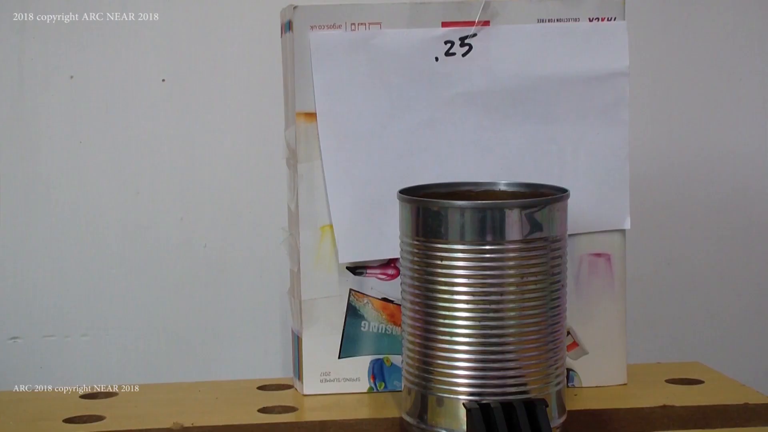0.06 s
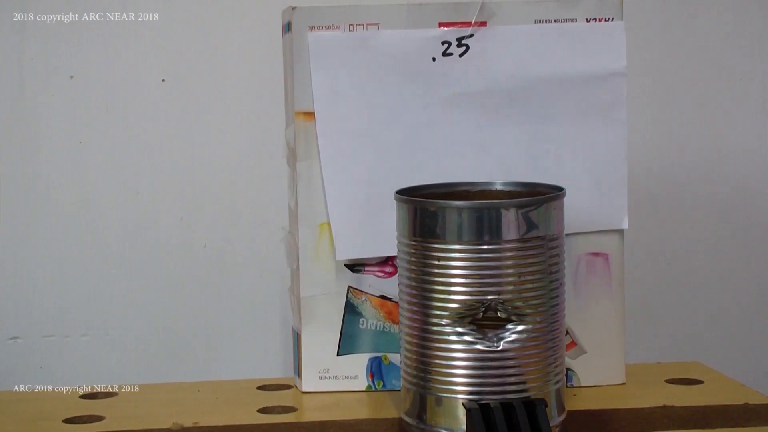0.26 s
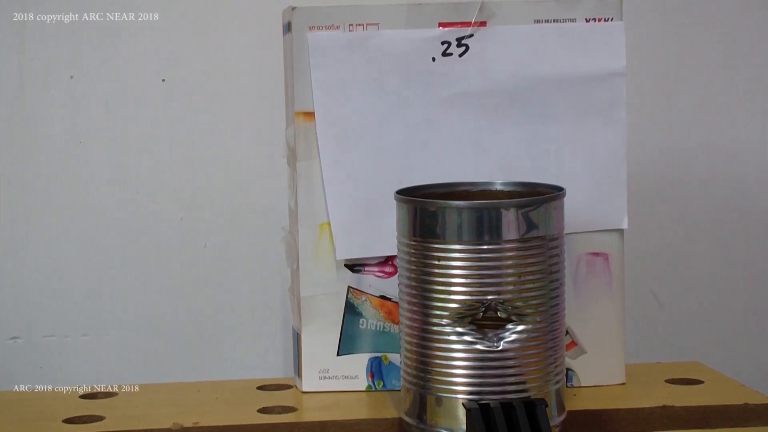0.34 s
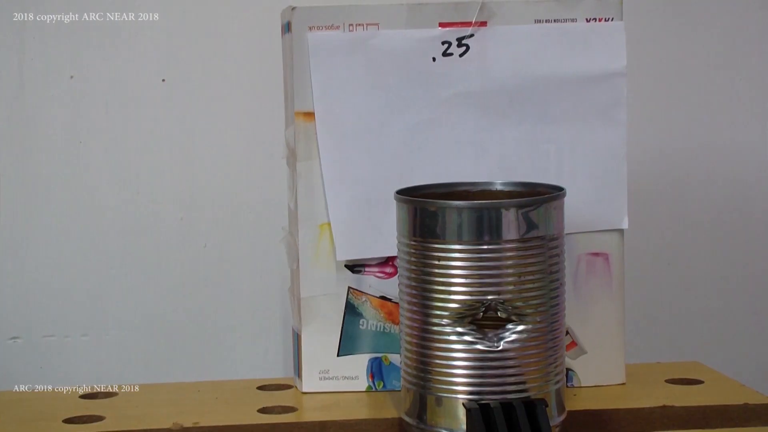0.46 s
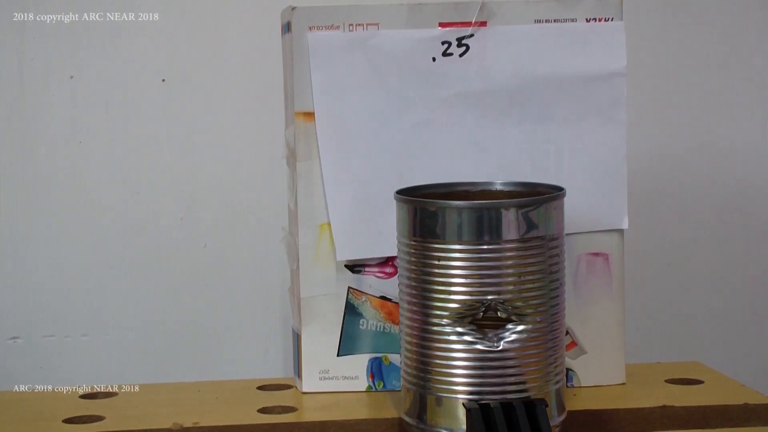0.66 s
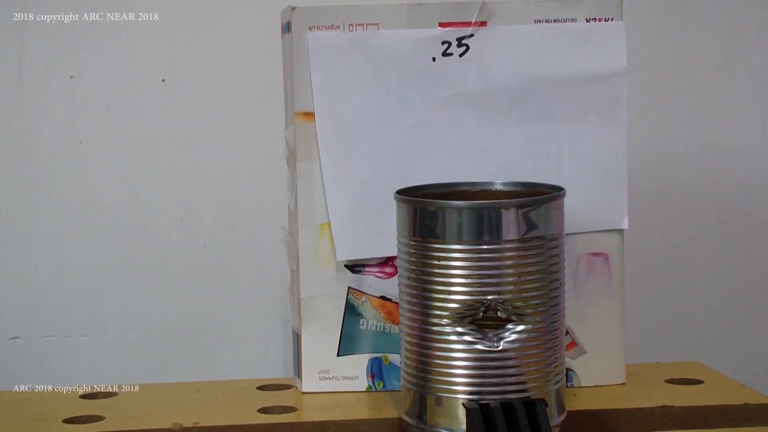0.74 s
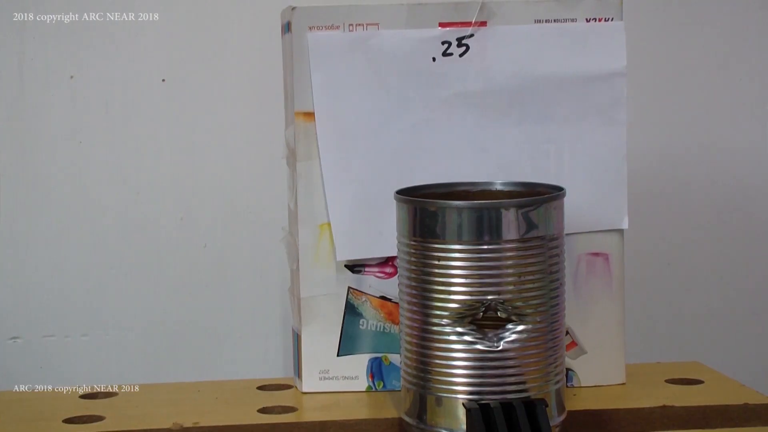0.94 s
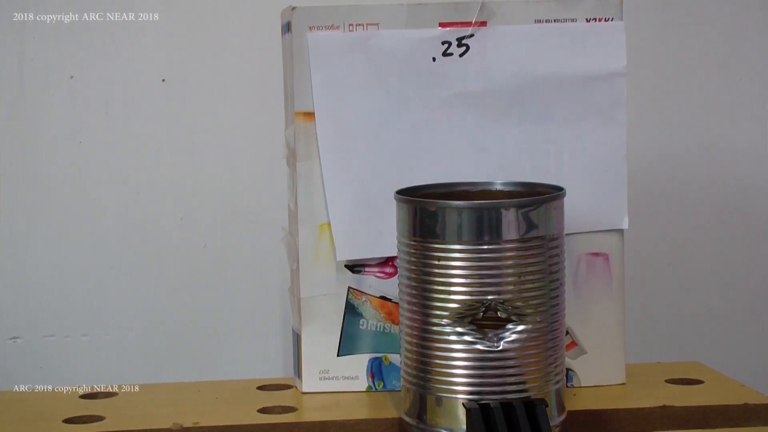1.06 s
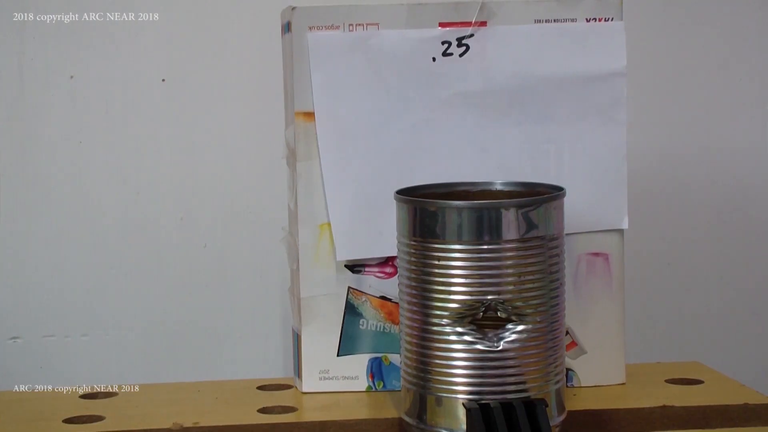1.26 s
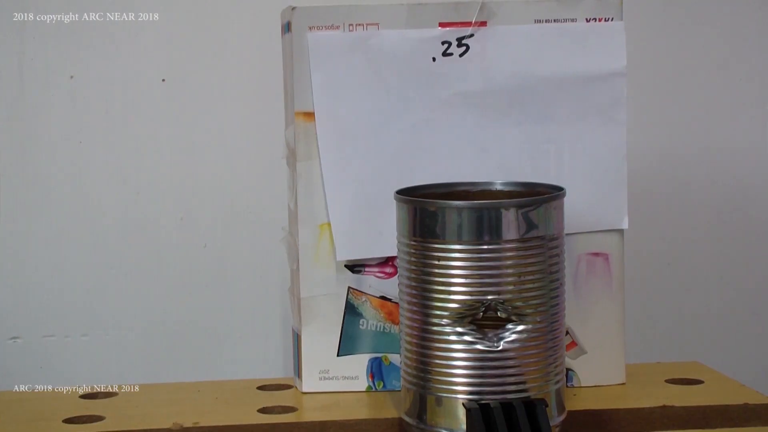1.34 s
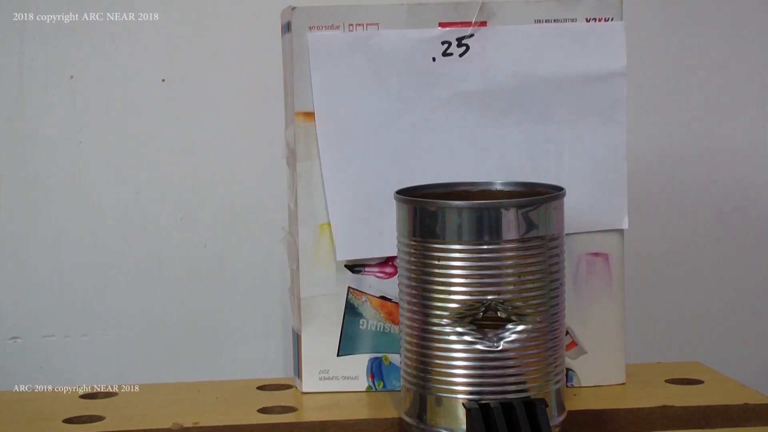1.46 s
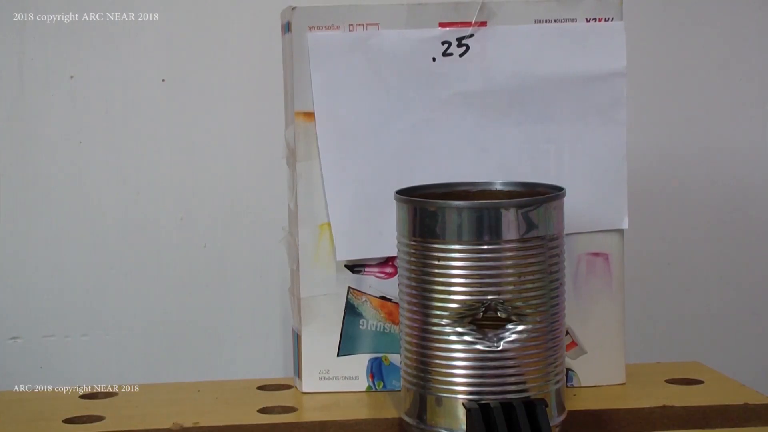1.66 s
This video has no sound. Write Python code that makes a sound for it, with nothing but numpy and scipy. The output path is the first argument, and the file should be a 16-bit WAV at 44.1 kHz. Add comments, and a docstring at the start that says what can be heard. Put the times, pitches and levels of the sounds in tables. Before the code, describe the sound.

An air rifle fires at about 0.2 seconds and its pellet instantly hits a tin can: one loud, sharp bang that overloads the microphone and rings briefly in a small hard room. Metal bits tick down around 0.5 seconds. The rifle clicks at 0.9 and 1.2 seconds, with very faint creaks. From 1.4 to 1.7 seconds a hard object clatters lightly to rest over faint hiss.

```python
"""A spring air rifle fires in a small hard room: its spring lets go and its piston slams home.
The pellet rips into a nearby tin can, which rings. The bang overloads the microphone, so a limiter
turns the sound down, then lets the ringing room swell back up. Bits of metal tick down, the rifle
clicks twice as it is handled, and something hard clatters to rest over faint creaks, rubs and hiss.
Each impact is a sharp snap plus fading noise and room echo, filtered to the tone of its object."""
import sys
import numpy as np
from scipy import signal
from scipy.fft import rfft, irfft
from scipy.io import wavfile
from scipy.ndimage import uniform_filter1d, minimum_filter1d

SR = 44100
rng = np.random.default_rng(int(sys.argv[2]) if len(sys.argv) > 2 else 0)


def wrap_up_sound(samples):
    """Save the sound to the file named by the first command line argument, as 16-bit audio."""
    columns = np.atleast_2d(samples).T
    # keep every value between -1 and 1, then stretch to whole-number steps
    tamed = np.clip(columns, -1, 1)
    steps = np.round(tamed * 32767).astype(np.int16)
    wavfile.write(sys.argv[1], SR, steps)


N = 74970  # 1.7 seconds

# The spring and piston let go: (time [s], level [dB], length [s])
SPRING_HITS = [(.2105, -28, .003), (.2122, -1, 0.006), (.2168, -9, 0.013)]
# Their tone: (frequency [Hz], level [dB])
SPRING_TONE = [(40, 15.5), (150, 9), (500, -11), (1200, -8), (2700, 11), (5500, 0.5), (9000, -11),
               (16000, -3.5)]
# The rifle kicks, the piston slams home, air leaves the barrel: (time [s], level [dB], length [s])
SHOT_THUMPS = [(.2100, -23, 0.012), (.2203, -5, 0.0013), (.2228, -2.5, 0.009)]
# Their deep tone: (frequency [Hz], level [dB])
THUMP_TONE = [(30, 20.5), (60, 5), (150, 7), (400, 1.5), (900, -4), (2000, -4), (4000, -13), (9000, -13),
              (16000, -10)]
# The rifle clicks as it is handled: (time [s], level [dB], length [s])
HANDLING_CLICKS = [(.8705, -13, 0.0091), (1.2278, -20, 0.013)]
# Their tone: (frequency [Hz], level [dB])
CLICK_TONE = [(40, -21), (120, -14), (200, -2), (400, 1.5), (800, 2.5), (1400, 0), (2700, 0), (4500, -4.5),
              (7000, -7), (10000, -16), (12500, -29), (15500, -25)]


def air_rifle():
    """The spring drives the piston home with a thump; later, handling makes two clicks."""
    spring = impacts(SPRING_HITS, SPRING_TONE, snap=0.05, echo_db=-4.5)
    thumps = impacts(SHOT_THUMPS, THUMP_TONE, snap=1.0, echo_db=-5)
    clicks = impacts(HANDLING_CLICKS, CLICK_TONE, snap=0.49, echo_db=-0.5)
    return spring + thumps + clicks


# The pellet tears into the can, then strikes once more: (time [s], level [dB], length [s])
PELLET_HITS = [(0.228, 43.5, 0.041), (.2560, 36, 0.015)]
# Their tone: (frequency [Hz], level [dB])
PELLET_TONE = [(30, -19), (120, -29.5), (400, -11.5), (600, -6.5), (800, 7), (1150, 1.5), (1550, 0.5),
               (2200, -2), (4500, -1.5), (8000, -4.5), (11000, -7), (16000, -12)]
# The can's notes; the last five linger faintly: (frequency [Hz], level [dB], time to fade 60 dB [s])
CAN_NOTES = [(180, -8, .27), (574, -5, .36), (675, 2, .28), (759, 9, .27), (828, 6, .27), (863, 5, .29),
             (1040, 0, .3), (1258, 3, .28), (1440, 0, .29), (1513, 2, .32), (1580, -6, .39),
             (1931, -1, .31), (2895, 0, .33), (4012, -1, .3), (4189, 0, .3), (4308, -1, .3),
             (4754, -1, .33), (7207, -4, .33), (7479, -2, .34), (7570, -3, .34), (11747, -7, .3),
             (667, -51, 1), (1183, -53, 1.2), (1572, -51, 1.1), (3801, -49, 1.25), (3860, -47, 1.25)]


def tin_can():
    """The pellet tears the tin, which rings with many fading notes at once."""
    out = impacts(PELLET_HITS, PELLET_TONE, snap=0.062, echo_db=2.5)
    hit_time = PELLET_HITS[0][0]
    t = np.arange(SR) / SR
    for hz, db, fade_s in CAN_NOTES:
        note = np.sin(2 * np.pi * (hz * t + rng.random()))
        add(out, hit_time, gain(db) * fade(t, fade_s) * note)
    return out


# The rifle's kick, then the pellet, shove the shelf: (time [s], level [dB], length [s])
SHELF_SHOVES = [(.2103, -11.5, 0.025), (.2290, 29.5, 0.025)]
# Their low tone: (frequency [Hz], level [dB])
SHELF_TONE = [(25, -18.5), (55, -15), (110, 2), (160, 3.5), (240, 0), (450, -9.5), (1000, -25.5),
              (4000, -47)]


def shelf_thuds():
    """Two shoves travel through the shelf as low thuds with almost no echo."""
    return impacts(SHELF_SHOVES, SHELF_TONE, snap=0.11, echo_db=-39)


# Bits of metal land: (time [s], level [dB], length [s])
BIT_LANDINGS = [(.4462, 0, .004), (.4742, -10, .003), (.4848, 3, .005), (.5338, -15, .004),
                (.5410, -19, .005)]
# Their bright tone: (frequency [Hz], level [dB])
BIT_TONE = [(200, -25), (1000, -16), (2200, -3.5), (4000, -1.5), (6500, -3.5), (7800, 0.5), (9500, -6),
            (16000, -30)]


def metal_bits():
    """Small bits of metal tick as they land."""
    return impacts(BIT_LANDINGS, BIT_TONE, snap=0.3, echo_db=-6)


# A hard object bounces: (time [s], level [dB], length [s], treble tilt [dB per octave])
OBJECT_BOUNCES = [(1.4028, -8.5, 0.0028, 5.5), (1.4068, -12, 0.011, -4), (1.4115, -25, 0.0065, 0),
                  (1.4838, -12, 0.0011, 1), (1.4872, -17, .010, -0.5), (1.5200, -42, 0.0022, 5),
                  (1.5368, -19, 0.0066, -1), (1.5635, -21, 0.017, 1.5), (1.5948, -15.5, .009, 1.5),
                  (1.6180, -32, 0.077, -4), (1.6500, -30.5, 0.055, -4.5), (1.6900, -31.5, .04, 3.5)]
# Its tone: (frequency [Hz], level [dB])
OBJECT_TONE = [(60, -32), (350, -26), (750, -7), (1250, 0.5), (1800, 5.5), (2500, 1), (3700, -9),
               (4800, -10.5), (8000, -22), (12000, -38), (16000, -46)]


def clatter():
    """A hard object drops and bounces unevenly to rest."""
    return impacts(OBJECT_BOUNCES, OBJECT_TONE, snap=0.56, echo_db=-1)


# Small slips that creak: (time [s], level [dB], length [s], pitch [Hz])
CREAK_SLIPS = [(.815, -35, 0.0083, 2360), (.820, -33.5, 0.016, 1980), (1.135, -39.5, 0.013, 730)]


def creaks():
    """Each slip rings faintly in a narrow band around one pitch."""
    out = np.zeros(N)
    band_width = 0.091  # as a share of the pitch
    for start, db, length, hz in CREAK_SLIPS:
        resonance = signal.iirpeak(hz, 1 / band_width, SR)
        creak = signal.lfilter(*resonance, contact(length, snap=0, echo_db=-1))
        add(out, start, gain(db) * normalize(creak))
    return out


# Hands rub the rifle: (time of peak [s], level [dB], swell time [s])
HAND_RUBS = [(1.16, -68, 0.078), (1.38, -66.5, 0.038)]
# Their tone: (frequency [Hz], level [dB])
RUB_TONE = [(100, -1), (300, -5.5), (1000, -1), (3000, -2), (6000, -11), (10000, -15.5), (16000, -26)]


def rubbing_hands():
    """Hands sliding on the rifle make soft swells of noise."""
    t = np.arange(N) / SR
    swells = sum(gain(db) * np.exp(-((t - peak) / width) ** 2) for peak, db, width in HAND_RUBS)
    friction = apply_tone(rng.standard_normal(N), RUB_TONE)[:N]
    return swells * np.sqrt(N) * normalize(friction)


# How long the room rings: (frequency [Hz], time to fade 60 dB [s])
ROOM_FADES = [(100, 0.59), (300, 0.3), (800, 0.29), (1800, 0.32), (4000, 0.32), (8000, 0.33), (11000, 0.27),
              (16000, .26)]


def room_echo():
    """Reflections off the hard walls blur into noise; each frequency fades at its own speed."""
    hz, t, bands = signal.stft(rng.standard_normal(SR), SR, nperseg=256)
    bands = bands * fade(t, look_up(ROOM_FADES, hz)[:, None])
    _, echo = signal.istft(bands, SR, nperseg=256)
    swell_in = np.minimum(np.arange(len(echo)) / SR / 0.002, 1) ** 2  # takes 2 ms
    return normalize(echo * swell_in)


# The tone of the quiet room: (frequency [Hz], relative level [dB])
HISS_TONE = [(25, 1), (90, -3.5), (150, -12), (300, -8.5), (600, -14), (1000, -12), (1500, -10), (2050, -6),
             (2600, -22), (4500, -21.5), (9000, -28.5), (16000, -31.5)]


def room_hiss(level_db=-66.5):
    """The room has a steady, quiet noise of its own."""
    tone = gain(look_up(HISS_TONE, np.fft.rfftfreq(N, 1 / SR)))
    noise = irfft(rfft(rng.standard_normal(N)) * tone, N)
    return gain(level_db) * np.sqrt(N) * normalize(noise)


def impacts(rows, tone, snap, echo_db):
    """Plays a table of hits on one object, filtered to that object's tone."""
    out = np.zeros(N)
    for start, db, length, *tilt in rows:
        sound = apply_tone(contact(length, snap, echo_db), tone, *tilt)
        filter_gain = np.linalg.norm(apply_tone([1.], tone, *tilt))
        add(out, start, gain(db) * sound / filter_gain)
    return out


def contact(length, snap, echo_db, size=8192):
    """One touch: a sharp snap, a dense rattle that dies away, and the room's echo."""
    decay = np.exp(-2 * np.arange(size) / SR / length)
    rattle = normalize(rng.standard_normal(size) * decay)
    rattle[0] += snap
    out = gain(echo_db) * room_echo()
    add(out, 0, normalize(rattle))
    return out


def apply_tone(x, tone, tilt_db=0, size=4096):
    """Filters a sound by a tone table, adding tilt_db for each octave above 1000 Hz."""
    hz = abs(np.fft.fftfreq(size, 1 / SR))
    octaves = np.log2(np.maximum(hz, 1000) / 1000)
    log_gain = np.log(gain(look_up(tone, hz) + tilt_db * octaves))
    spectrum = np.exp(np.conj(signal.hilbert(log_gain)))  # rings after a hit, never before it
    return signal.fftconvolve(x, np.fft.ifft(spectrum).real[:size // 2])


def gain(db):
    """Turns decibels into a multiplier."""
    return 10 ** (np.asarray(db) / 20)


def fade(t, fade_s):
    """A curve that falls by 60 dB in fade_s seconds."""
    return np.exp(-np.log(1000) * t / fade_s)


def normalize(x):
    """Scales a sound to an energy of one."""
    return x / np.sqrt(np.sum(x ** 2) + 1e-20)


def look_up(table, hz):
    """Reads between a table's rows, with octaves evenly spaced."""
    frequencies, values = np.transpose(table)
    return np.interp(np.log(hz + 1), np.log(frequencies + 1), values)


def add(mix, start, sound):
    """Mixes a sound in at a start time in seconds."""
    part = mix[round(start * SR):][:len(sound)]
    part += sound[:len(part)]


def scene():
    """All the sounds meet at one microphone."""
    shot = air_rifle() + tin_can() + shelf_thuds() + metal_bits()
    return (shot + clatter() + creaks() + rubbing_hands() + room_hiss())[None]


def limiter(x, excess_db, hold_s=0.081, recover_db_per_s=159):
    """Turns the sound down by its excess level, waits, then lets it swell back."""
    hold = int(hold_s * SR) // 2 * 2 + 1  # an odd number of samples
    held_db = -minimum_filter1d(-excess_db, hold, origin=hold // 2)  # the highest recent excess
    recovery_db = recover_db_per_s * np.arange(N) / SR
    cut_db = np.maximum.accumulate(held_db + recovery_db) - recovery_db
    return x / gain(cut_db)


def overload_sway(excess_db, swing_hz=1.9, swing_decay_s=0.076, offset_decay_s=0.43):
    """The overloaded input swings off centre, and a small offset fades more slowly."""
    t = np.arange(N) / SR
    bang_time = t[np.argmax(excess_db > excess_db.max() / 2)]
    age = np.maximum(t - bang_time, 0)
    envelope = np.minimum(age / 0.0057, 1) * np.exp(-age / swing_decay_s)
    swing = gain(-23.5) * envelope * np.cos(2 * np.pi * swing_hz * age + 1)
    offset = gain(-54.5) * (age > 0) * np.exp(-age / offset_decay_s)
    return -swing - offset


def record(dry):
    """The microphone loses deep bass and overloads; the sound is limited and its top treble cut."""
    low_cut_hz, high_cut_hz = 39, 15850
    overload_db, limit_db, ceiling_db = 20, -21.5, -15.8
    x = signal.sosfilt(signal.butter(2, low_cut_hz, "high", fs=SR, output="sos"), dry[0])
    x = gain(overload_db) * np.tanh(x / gain(overload_db))
    power = abs(uniform_filter1d(x ** 2, size=64))
    excess_db = np.maximum(10 * np.log10(power + 1e-12) - limit_db, 0)
    x = limiter(x, excess_db) + overload_sway(excess_db)
    x = x / (1 + (x / gain(ceiling_db)) ** 4) ** (1 / 4)  # rounds off the peaks
    low_pass = signal.firwin(511, high_cut_hz, window=("kaiser", 9), fs=SR)
    return signal.oaconvolve(x, low_pass, "same")[None]


dry = scene()
out = record(dry)
wrap_up_sound(out)
```